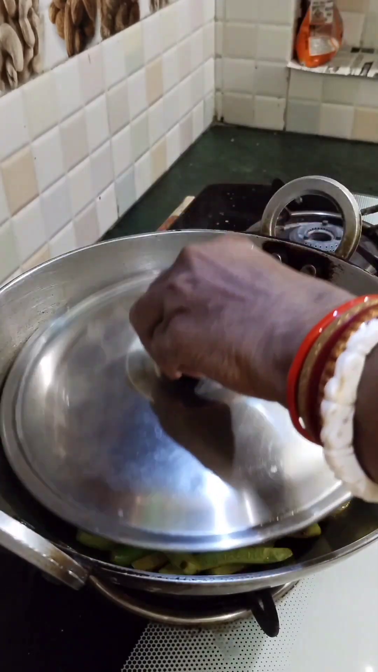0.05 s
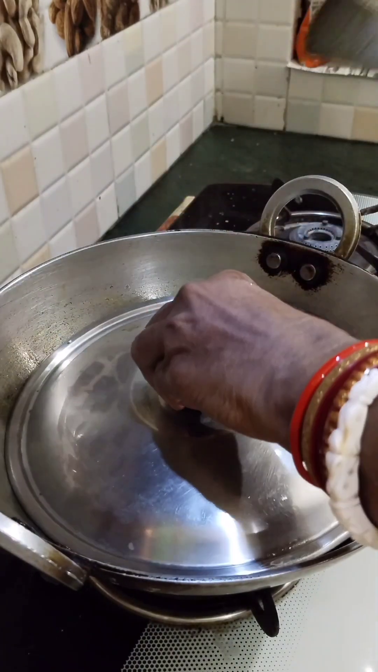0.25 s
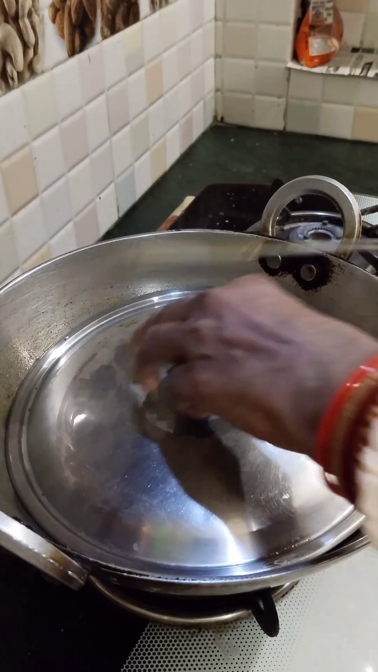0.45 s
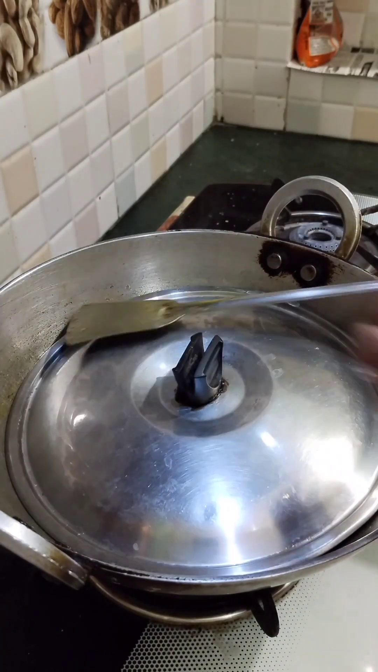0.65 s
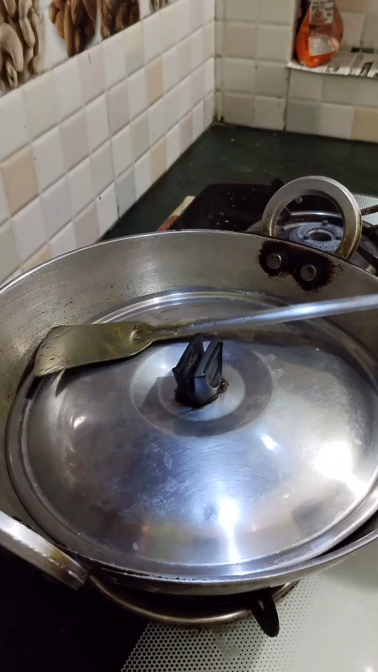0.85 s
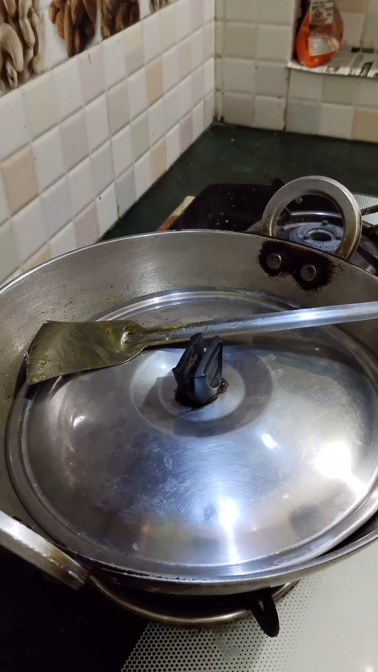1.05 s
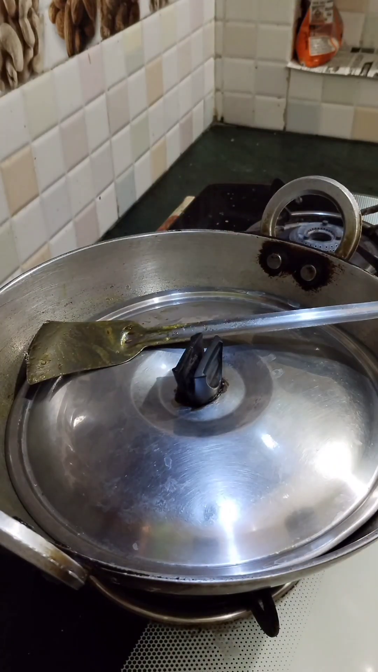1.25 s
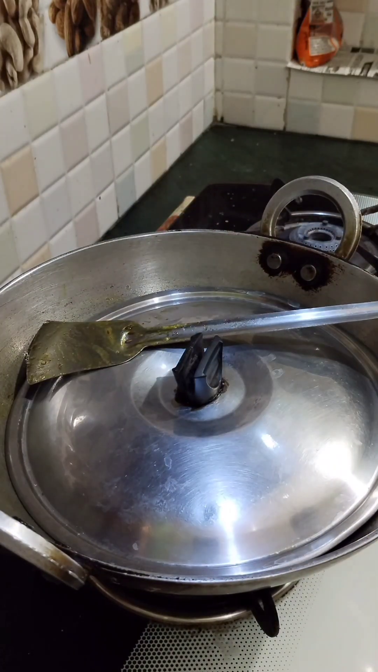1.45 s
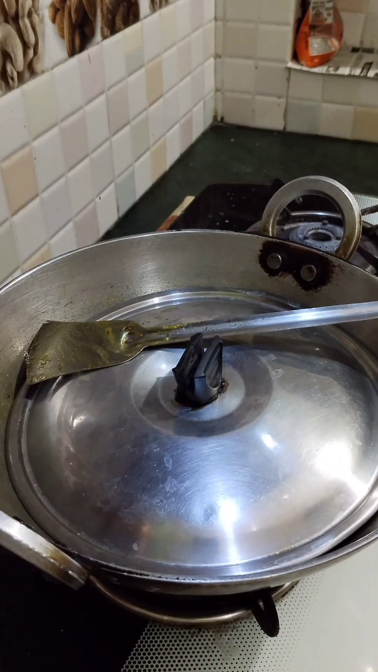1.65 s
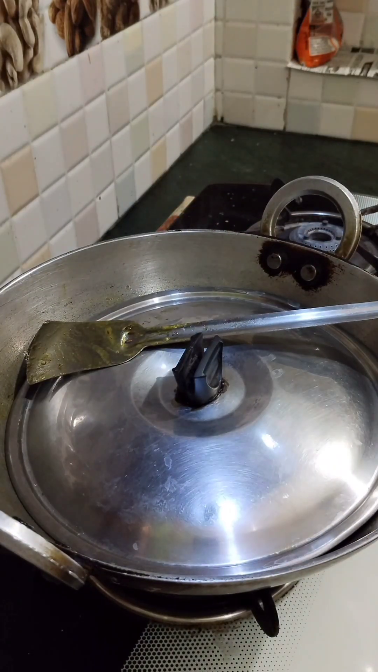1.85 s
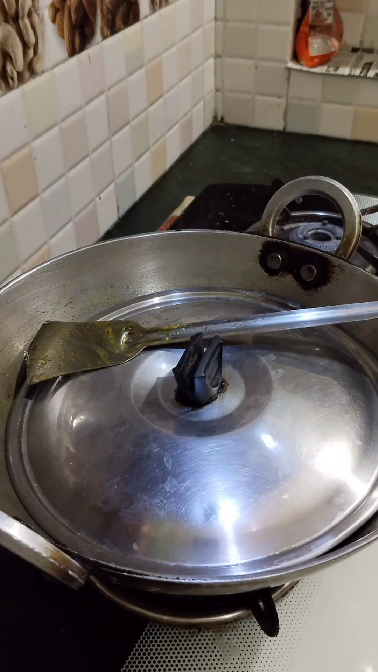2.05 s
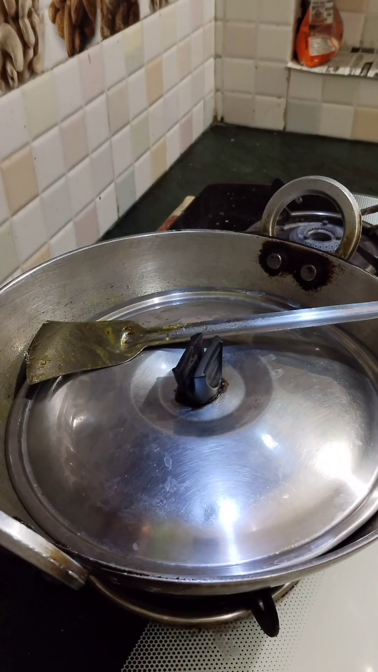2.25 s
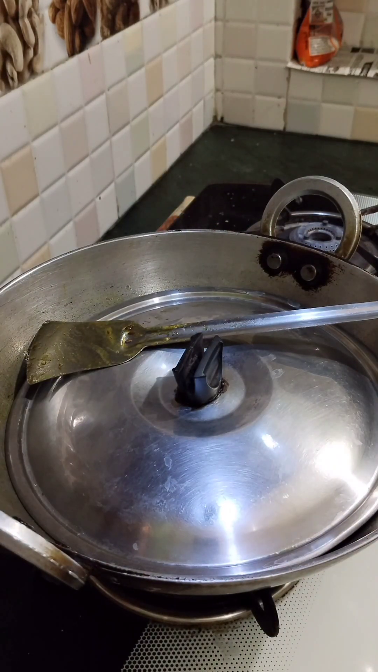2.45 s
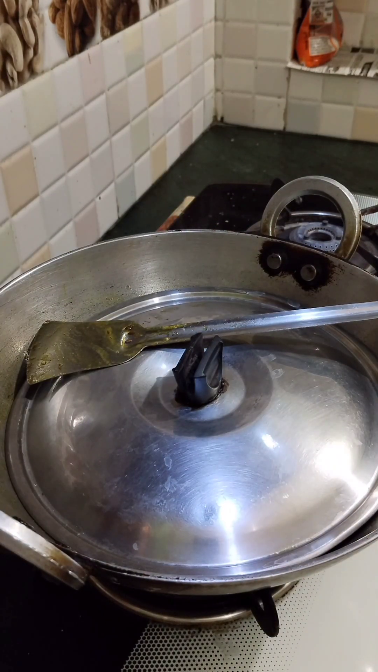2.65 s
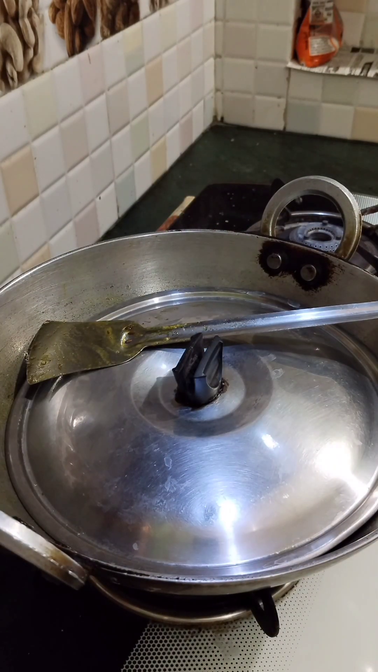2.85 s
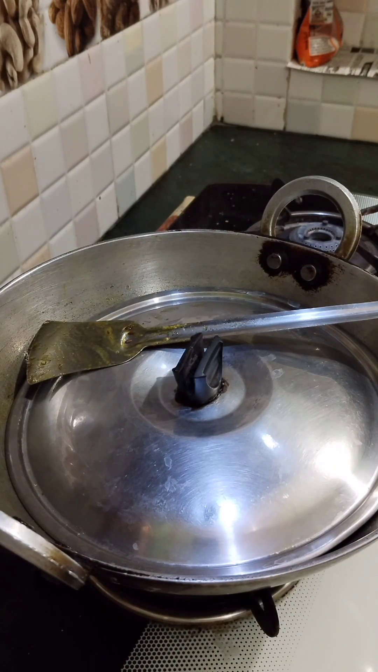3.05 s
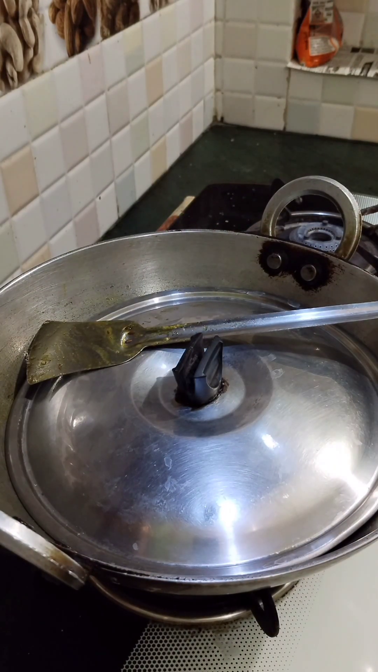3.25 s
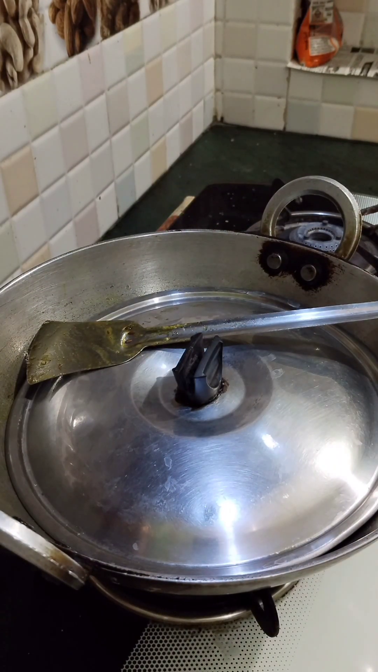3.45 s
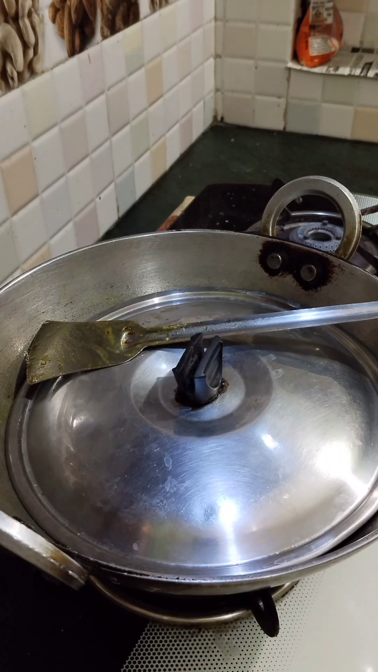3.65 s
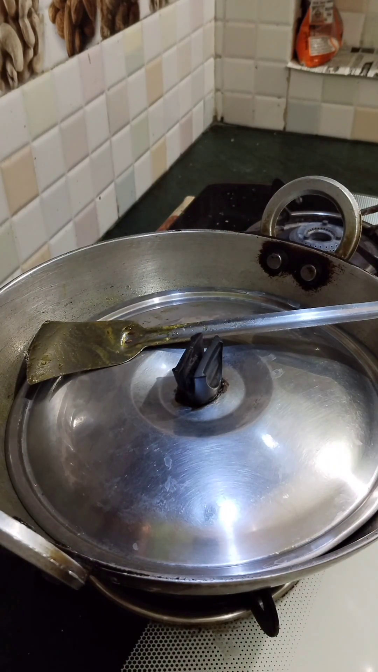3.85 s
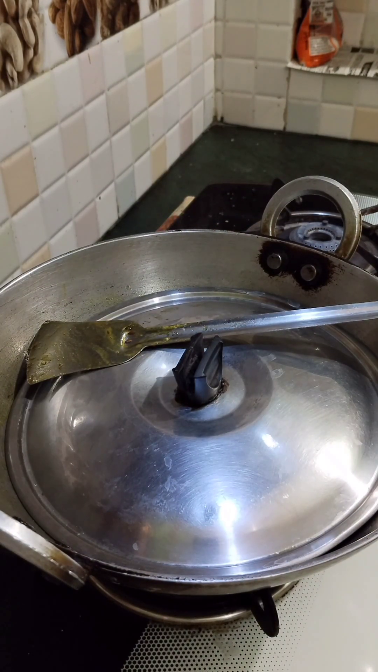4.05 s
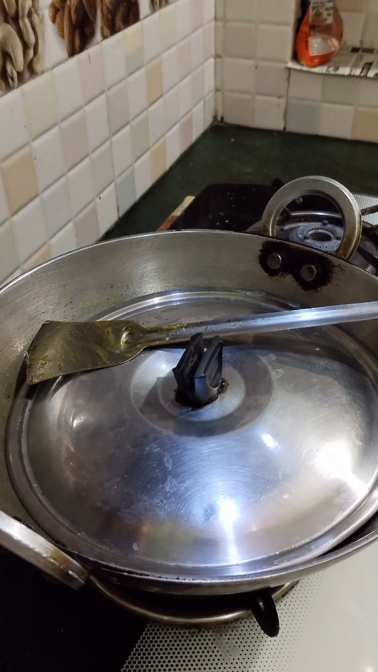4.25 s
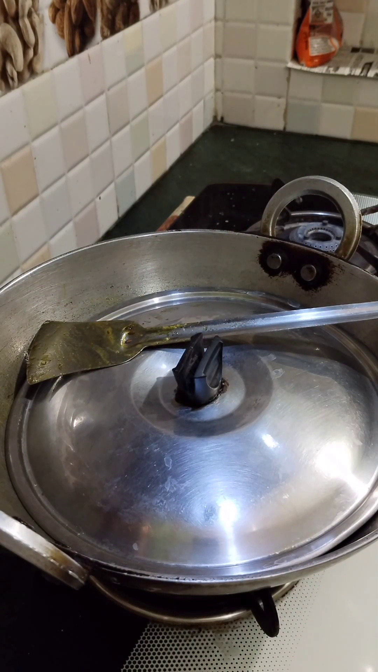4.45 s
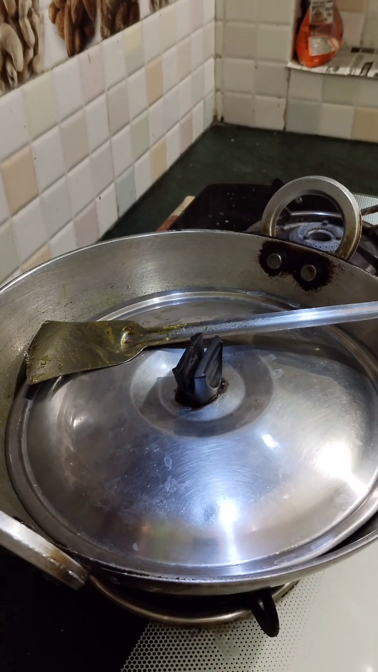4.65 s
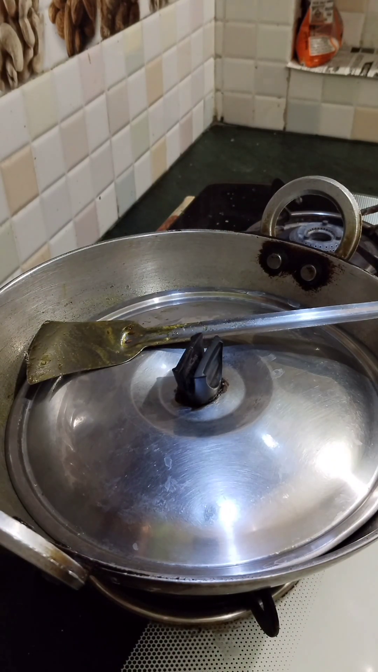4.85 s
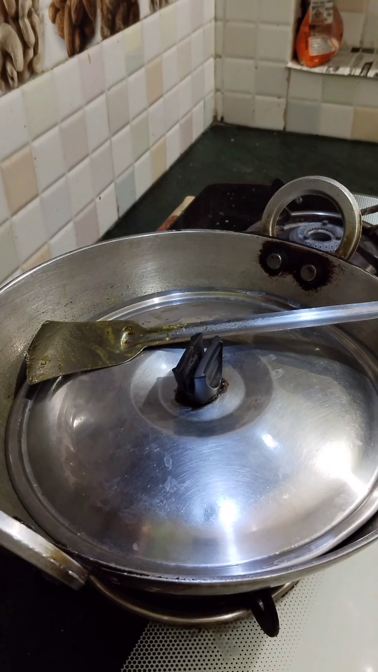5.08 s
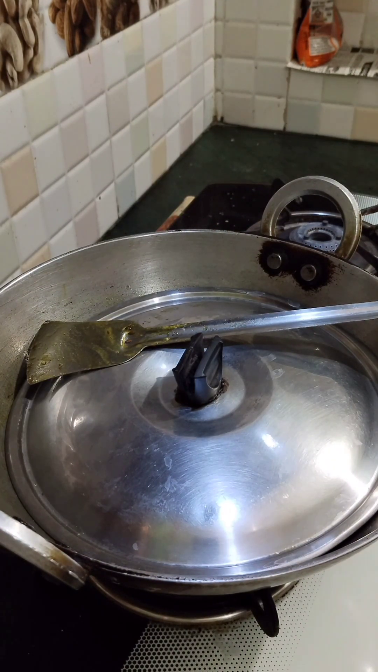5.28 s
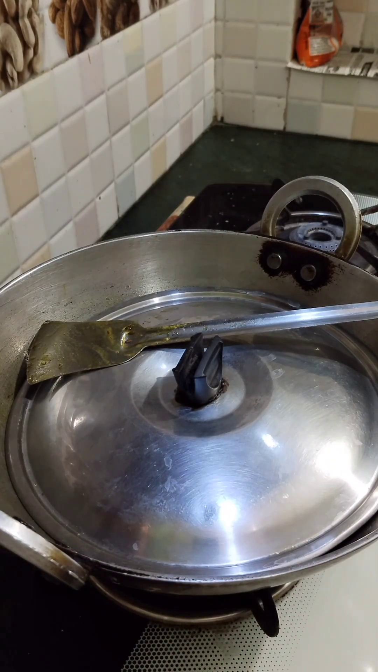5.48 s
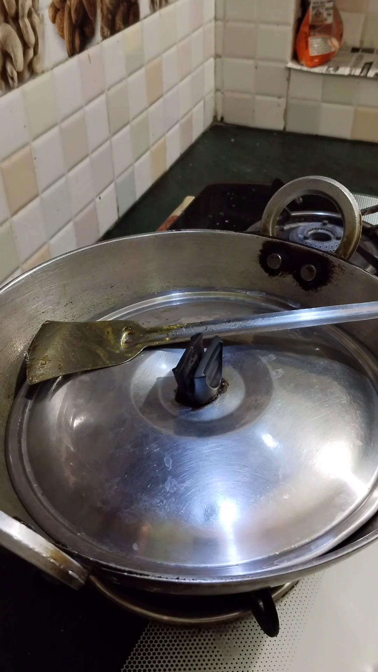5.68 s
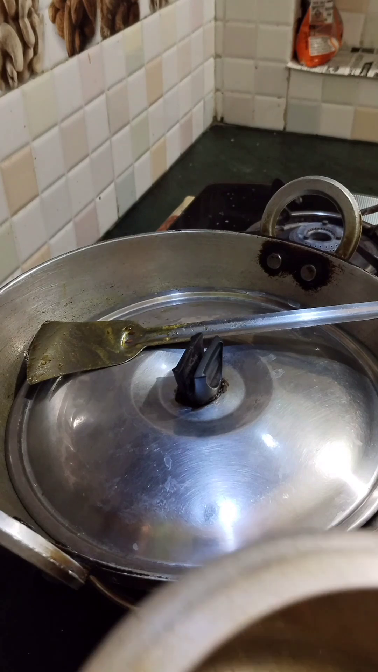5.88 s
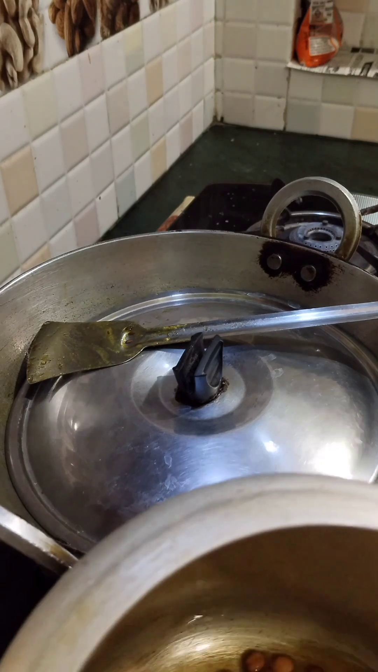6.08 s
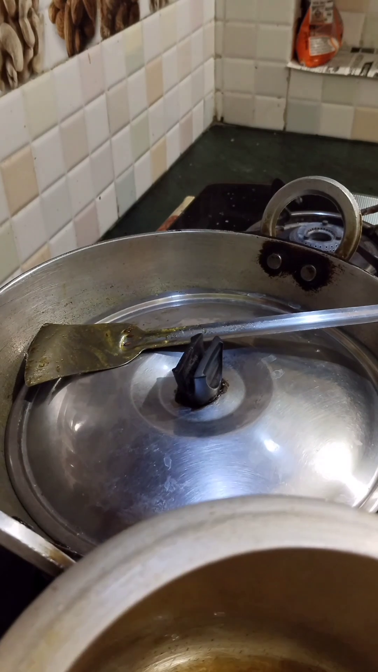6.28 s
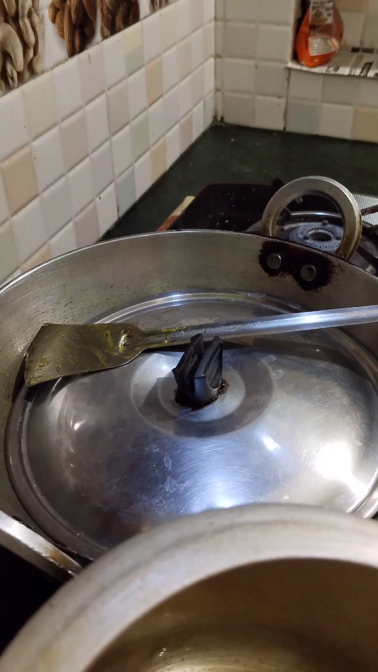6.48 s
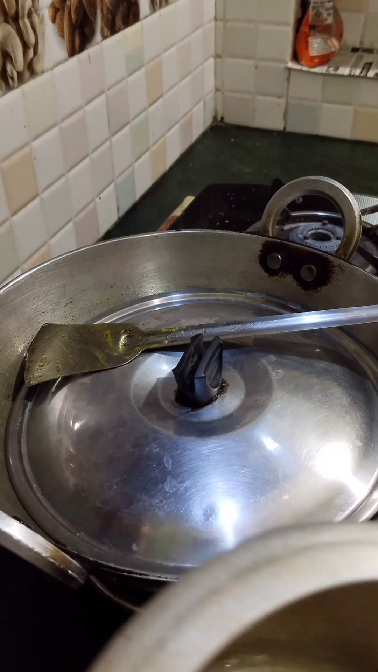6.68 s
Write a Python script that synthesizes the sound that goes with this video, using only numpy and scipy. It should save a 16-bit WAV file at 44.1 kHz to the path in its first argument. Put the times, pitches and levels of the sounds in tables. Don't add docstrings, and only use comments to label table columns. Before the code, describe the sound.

Close stereo phone sound in a small tiled kitchen. Vegetables crackle in a steel pan; a lid clanks on and the frying drops to a soft, muffled sizzle. A spatula lands with a sharp bright clack and rattles. Bowls and plates clink and ring on the worktop, a bowl drops loudly, then a pot and its lid clang, and finally a heavy vessel knocks down near the pan.

```python
import sys
import numpy as np
from scipy import signal
from scipy.fft import rfft, irfft, next_fast_len
from scipy.io import wavfile
from scipy.ndimage import uniform_filter1d

SR = 44100
rng = np.random.default_rng(int(sys.argv[2]) if len(sys.argv) > 2 else 0)


def boost_factor(decibels):
    exponent = np.asarray(decibels, float) / 20
    return 10 ** exponent


def pcm_store(signal):
    levels = np.round(np.clip(np.atleast_2d(signal), -1, 1) * 32767)
    wavfile.write(sys.argv[1], SR, levels.astype(np.int16).T)


N = 296352

# pitch_hz, level_db
DOME_SPECTRUM = [(180, -47), (300, -10.5), (380, -16), (437, -11.5), (900, -12.5), (1100, -5.5),
                 (1310, 0.5), (1690, -11.5), (1970, 2.5), (2410, -3), (2680, 1.5), (3270, 0.5), (4240, -8),
                 (6500, -11), (11000, -120)]
# pitch_hz, level_db
HISS_SPECTRUM = [(2350, -10), (5730, -7), (7270, -6), (7790, -0.5), (8500, -0.5), (10200, -8.5),
                 (13500, -10.5), (15500, -9)]


def evened(x):
    return x / np.sqrt(np.mean(x ** 2) + 1e-20)


def read(points, hz):
    point_hz, value = np.transpose(points)
    return np.interp(np.log(hz + 1), np.log(point_hz + 1), value)


def curve(rows):
    return np.interp(np.arange(N) / SR, *np.transpose(rows))


def add(mix, start_s, sound):
    part = mix[:, round(start_s * SR):][:, :sound.shape[1]]
    part += sound[:, :part.shape[1]]


def spread(hz, apart_db=0):
    # pitch_hz, level_db
    port_difference = [(60, -15), (200, -10), (380, -4), (700, .5), (1400, 2), (2380, -.5), (4400, 0),
                       (15000, -1)]
    return boost_factor(np.array([0 * hz, read(port_difference, hz) + apart_db]))


def coloured(x, points, tilt_db=0, apart_db=0):
    lag_rad = 1.2
    hz = np.fft.rfftfreq(x.shape[1], 1 / SR)
    gain = boost_factor(read(points, hz) + tilt_db * np.log2(hz / 2000 + .01))
    gain = gain * spread(hz, apart_db) * np.exp([[0], [-1j * lag_rad]])
    return irfft(rfft(x) * gain, x.shape[1])


def causal(points):
    hz = abs(np.fft.fftfreq(4096, 1 / SR))
    log_gain = np.log(boost_factor(np.maximum(read(points, hz), -60)))
    phase = -signal.hilbert(log_gain).imag
    return np.fft.ifft(np.exp(log_gain + 1j * phase)).real[:2048]


def drift(per_s):
    hz = np.fft.rfftfreq(N, 1 / SR)
    return evened(irfft(rfft(rng.standard_normal(N)) / (1 + (hz / per_s) ** 2), N))


def bubbles(per_s, spread_db, wet_s, shared):
    chance = per_s / SR * boost_factor(1.1 * drift(10))
    size = boost_factor(spread_db * np.minimum(rng.exponential(1, (3, N)), 4.5))
    draw = rng.random((3, N))
    bursts = size * (draw < chance) * np.sign(draw - chance / 2)
    clicks = shared * bursts[0] + bursts[1:]
    keep = boost_factor(-120 / (wet_s * SR))
    smear = np.sqrt(signal.lfilter([1 - keep], [1, -keep], clicks ** 2))
    return clicks + 1.1 * smear * rng.standard_normal((2, N))


def clatter_swells():
    # start_s, rise_and_fall_s, dome_lift_db, hiss_lift_db
    swells = [
        (2.77, .3, 1.5, 3.5),
        (3.26, .25, 6.5, 3.5),
        (4.7, .22, 6, 11),
    ]
    t = np.arange(N) / SR
    return sum(np.outer(lift_db, np.maximum(1 - abs(t - s) / half_s, 0)) for s, half_s, *lift_db in swells)


def frying():
    # start_s, level_db
    sizzle = [
        (0.0, -37.5),
        (0.34, -42),
        (1.5, -44.5),
        (2.4, -42.5),
        (3.65, -44.5),
        (4.04, -44.5),
        (4.23, -47.5),
        (6.72, -46.5),
    ]
    # pitch_hz, width_hz, level_db
    lid_hum = [
        (433.4, 13, -16.5),
        (489.4, 20, -18),
    ]
    spits = bubbles(2500, 2.8, 0.05, 0.4)
    dome = coloured(spits, DOME_SPECTRUM)
    dome /= np.std(dome[0])
    for hz, width_hz, db in lid_hum:
        hum = evened(signal.lfilter(*signal.iirpeak(hz, hz / width_hz, SR), spits))
        dome += boost_factor(db) * spread(hz)[:, None] * hum
    hiss = coloured(bubbles(7000, 2.5, 0.045, 0.11), HISS_SPECTRUM)
    hiss /= np.std(hiss[0])

    t = np.arange(N) / SR
    level_db = curve(sizzle)
    dome_lift_db, hiss_lift_db = clatter_swells()
    hiss_db = -47.5 + .3 * (level_db - level_db.mean())
    hiss_db = hiss_db - .9 * t
    hiss_db = hiss_db + 5 * np.exp(-t / .2)
    hiss_db = hiss_db + hiss_lift_db
    return dome * boost_factor(level_db + dome_lift_db - 1.48) + hiss * boost_factor(hiss_db + 1.6)


def room_tone():
    # pitch_hz, level_db
    rumble_spectrum = [(15, -48), (25, -16), (65, 1), (151, -1.5), (243, -10), (400, -17), (520, -35),
                       (880, -120)]
    # pitch_hz, level_db
    fan_orders = [
        (75.4, -55),
        (140.0, -62.5),
    ]
    start_db, fade_db_per_s = -59, .55
    tone = coloured(rng.standard_normal((2, N)), rumble_spectrum)
    tone *= boost_factor(start_db - fade_db_per_s * np.arange(N) / SR) / np.std(tone[0])
    for hz, db in fan_orders:
        turns = np.cumsum(hz * (1 + 0.0089 * drift(0.89))) / SR + rng.random()
        level = boost_factor(db - 11.0 + 1.4 * drift(3.3)) * np.sqrt(2)
        tone += spread(hz)[:, None] * level * np.sin(2 * np.pi * turns)
    return tone


def tail(share, length):
    # pitch_hz, t60_s
    kitchen_decay = [(150, 0.64), (400, 0.47), (1040, 0.49), (2760, 0.38), (7280, 0.29)]
    hz = np.fft.rfftfreq(256, 1 / SR)
    t = np.arange(length // 128 + 2) * 128 / SR
    re, im = rng.standard_normal((2, 2, len(hz), len(t)))
    t60_s = max(share, .05) * read(kitchen_decay, hz)[:, None]
    return signal.istft((re + 1j * im) * boost_factor(-60 * t / t60_s), SR, nperseg=256)[1][:, :length]


def clear_modes(modes, t, longest_s, apart_db, lean_rad, tilt_db):
    hz, db, t60_s = (column[:, None] for column in np.transpose(modes))
    t60_s = np.clip(t60_s, .03, longest_s * np.minimum(1, 2800 / hz))
    split_hz = 0.0041 * hz * hz / 3000 * rng.uniform(0.34, 1, hz.shape)
    step = np.exp((2j * np.pi * np.array([hz, hz + split_hz]) - np.log(1000) / t60_s) / SR)
    main, twin = np.cumprod(np.broadcast_to(step, step.shape[:2] + t.shape), axis=2)
    turn = (np.pi / 2 - lean_rad + .3 * rng.standard_normal(hz.shape)) * [0, 1]
    level = spread(hz[:, 0], apart_db) * boost_factor(db + tilt_db * np.log2(hz / 2000)).T * np.exp(-1j * turn.T)
    return (level @ (main + 0.42 * twin)).imag


def dense_modes(colour, t, share, apart_db, tilt_db):
    wash = coloured(tail(share, len(t)), colour, tilt_db, apart_db)
    ridges = evened(uniform_filter1d(rng.standard_normal(len(t) // 2 + 1), size=round(70 * t[-1])))
    return irfft(rfft(wash) * boost_factor(3.5 * ridges), len(t))


def contacts(rattle_s, t):
    touch = rng.standard_normal(3000) * (rng.random(3000) < .012) * np.exp(-t[:3000] / max(rattle_s, .001))
    touch = touch * [[.25], [1]]
    touch[:, 0] = 2.13
    touch[0] *= np.linalg.norm(touch[1]) / np.linalg.norm(touch[0])
    return touch


def blow(modes, colour, longest_s, apart_db, lean_rad, share, clear_db, rattle_s, tilt_db=0.3):
    tick_db, tick_s = -15, .004
    rise_s = .0011
    crest = 2.7
    t = np.arange(next_fast_len(round(max(longest_s, .42) * SR), True)) / SR
    clear = clear_modes(modes, t, longest_s, apart_db, lean_rad, tilt_db)
    dense = dense_modes(colour, t, share, apart_db, tilt_db)
    start = slice(0, 900)
    clear = boost_factor(clear_db + .6) * clear / np.std(clear[0, start])
    dense = dense / np.std(dense[0, start])
    edge = np.diff(dense, prepend=0)
    dense += boost_factor(tick_db) * edge / np.std(edge[0, start]) * np.exp(-t / tick_s)

    body = np.array([clear, dense])
    mean_hz = np.transpose(modes)[0].mean()
    body *= np.clip(np.minimum(t * mean_hz / 1.3, (t[-1] - .06 - t) / .1), 0, 1)
    body *= 1 - np.exp(-(t / rise_s) ** 2)
    touch = contacts(rattle_s, t)
    sound = signal.fftconvolve(body, touch[:, None], axes=2).sum(0)[:, :len(t)]
    return sound / (crest * np.sqrt(uniform_filter1d(sound[0, :2200] ** 2, size=400).max()))


def clanks():
    # (start_s, peak_db, rattle_s and, where the
    # spot struck matters, tilt_db an octave)
    lid = ([(170, -5.5, .2), (434, 0, .25), (485, 1.5, 0.2), (864, 10, 0.12), (1054, -10, 0.27),
           (1267, -2, 0.5), (1420, -5, .2), (1880, -7, .5), (2900, -10, .3), (3800, -9, .15)], [(150, -7.5),
           (396, -23), (490, 3.5), (656, -16), (860, -8), (966, -17), (1290, -0.5), (1700, -12),
           (7000, -15), (15500, -26)], 0.67, 0.89, 1.5, [(0.083, -10.5, 0.02), (.125, -20, .015, 1)])
    lid_settling = ([(440, -10, .15), (483, 0, 0.27), (772, -13, 0.3), (892, -5, 0.13), (1203, 4, 0.14),
                    (1330, -9, 0.5)], [(150, -36), (380, -16), (476, -0.5), (643, -12), (1300, -19),
                    (4000, -25.5), (5200, -59), (8800, -120)], 0.33, .7, 6.5, [(0.226, -12.5, 0.0083),
                    (0.284, -25, 0.0045)])
    blade = ([(434, -11, .25), (872, -11, 0.12), (1115, -6, 0.1), (3010, -10, .1), (5950, 0, .07),
             (7700, -1, .16), (8100, 0, .08), (8900, -2, .07)], [(150, -15), (230, -24), (350, -22),
             (432, -16), (650, -22), (1150, -15), (2200, -17), (3510, -18), (7920, -10), (15500, -31.5)],
             0.54, .5, -3, [(0.7865, -4.5, 0.004)])
    blade_rebound = ([(3015, 0, .12), (6300, -8, .08), (1500, -9, .1)], [(300, -36), (1300, -16),
                     (3000, -6), (8000, -14), (15500, -35)], .4, .5, 8, [(0.805, -14, .004)])
    handle = ([(433.5, -2.5, 0.27), (485.7, -2, 0.36), (1251, 0, 0.36), (3016, -6, .3), (5850, -4, 0.11),
              (7750, -5, .25), (9000, -8, .08)], [(120, -29), (282, -37), (432, -4), (1000, -18),
              (1220, -11.5), (2920, -16), (5960, -19), (15500, -35)],
              0.4, .66, 1.5, [(0.9075, -18, 0.005, 0), (0.915, -18.5, 0.01, 1), (0.932, -12, 0.008, -3),
              (0.941, -11, 0.015, 3)])
    cutlery = ([(870, -9, .55), (3600, -6, .06)], [(410, -51), (861, -24), (943, -13), (1050, -17),
               (2200, -18), (6940, -12.5), (8320, -4), (10300, -19), (15500, -26)],
               0.69, .56, -14.5, [(2.7405, -18, 0.018), (2.762, -26, .008), (3.5768, -27.5, 0.022, 3.5),
               (4.0294, -32, 0.014, 4), (4.1579, -35, 0.032, 4)])
    pot_rim = ([(1120, 0, 0.071), (1310, 5.5, 0.067), (1580, -3, 0.092), (3850, -1, .12), (5380, -4, .15)],
               [(150, -14), (270, -20), (453, -8), (860, -12), (1110, -8), (3980, -6.5), (8330, -9),
               (15500, -23)], .25, .66, -1, [(4.515, -14.5, .008, -1.5), (4.52, -13, 0.04, 2),
               (4.536, -17, .015, 1), (4.56, -14.5, 0.012, 2)])
    pot = ([(178, -9, .3), (278, -9, .25), (677, -3, 0.28), (1875, -5, 0.23), (2545, -6, 0.22),
           (3180, -10, 0.18), (3925, -4, .25), (5346, -3, .3), (6880, -10, .12), (7200, -8, .15),
           (8200, 1, .25)], [(120, -23), (271, -12), (552, -7), (662, -1.5), (863, -13), (1830, -13),
           (2490, -8), (8420, -12), (10300, -21), (15500, -30)], .4, .67, -0.6, [(4.574, -17, .005),
           (4.581, -5, 0.02), (4.599, -12, 0.013)])
    pot_lid = ([(179, 0.4, 0.5), (2480, 7.5, 0.21), (2780, 12, 0.15), (3240, -2, .3), (5550, 3, .2),
               (8100, -8, .15)], [(120, -18), (180, -2), (212, -20), (265, -7.5), (650, -14), (2160, -23),
               (2810, -3), (5960, -16), (8300, -8), (10300, -20), (15500, -24)],
               .6, .62, -6, [(4.745, -22, .004), (4.7505, -5.5, 0.014), (4.821, -9, 0.01, 1.5),
               (4.83, -12, .008), (4.85, -19, .012)])
    cooker = ([(142.3, -17, 0.59), (432, -1.5, .27), (489, -2, 0.2), (710, -2.5, 0.1), (1290, -3, .2),
              (1880, 1, 0.06), (1930, -7, .4), (2760, -2.5, 0.18), (3720, -4, 0.088), (4600, -10, 0.18)],
              [(70, -40), (141, -9.5), (300, -9), (478, -4), (984, -17), (1230, -14.5), (1850, -15),
              (2800, -13), (6140, -17), (15500, -35)], 0.48, .8, -0.6, [(6.147, -8, 0.005),
              (6.175, -18.5, 0.0078)])
    cooker_tap = ([(440, -3, .15), (490, -4, .15), (1290, 2, .1), (1930, -6, .08), (2700, -7, .12)],
                  [(200, -20), (478, -5), (1290, -8), (3000, -14), (6000, -30)],
                  .4, .6, 6, [(6.3, -33, .004, -2), (6.316, -26, .006)])
    shelf = ([(145, -9, 0.33), (176.7, 0.5, 0.34), (281.6, 5.5, .4), (343.3, 10, 0.36)], [(60, -34.5),
             (160, -7), (320, 9.5), (480, -11.5), (900, -72)], .5, .45, 7, [ (2.715, -31, 0.003, -12),
             (2.75, -27.5, 0.015, -13), (2.846, -24, 0.0082, 7), (3.075, -27, .02, -8), (3.11, -23, .01, 4),
             (3.207, -16.5, 0.008, 2), (3.25, -16, .01, 3), (3.318, -16.5, 0.02, 5)])
    bowl = ([(864, -13, 0.78), (1080, 3, .03), (1280, 2, .04), (2650, -2, .09), (2690, -6, .5),
            (3500, -12, 0.2), (4100, -9, .08), (5660, -5, .17)], [(290, -66), (450, -28), (1030, -5),
            (1100, -3.5), (1650, -26.5), (2570, -11.5), (4840, -25), (5830, -21.5), (15500, -40)],
            0.93, .53, 3, [(2.843, -11, 0.003, 1)])
    plates = ([(868, -7, .4), (1330, -10, .2), (1600, -9, .2), (2864, 0, .16), (3670, -3.5, .25),
              (4200, -7, .15), (5680, -9, .3), (8450, -4, .1), (12000, -12, .1)], [(120, -11.5), (353, -14),
              (704, -19.5), (1870, -22), (2870, -6.5), (3660, -8.5), (4960, -20), (5490, -15), (8420, -10),
              (10300, -20), (15500, -35)], 0.45, .74, -0.6, [(3.06, -12, 0.005, 1.5), (3.068, -14, .012),
              (3.085, -14, .01, 1.5)])
    bowl_nudged = ([(1032, -5, 0.66), (2465, -1, 0.079), (2660, -6, 0.7), (3550, -5, .12), (4200, -4, .1),
                   (5680, -6, .12)], [(290, -49), (500, -17), (901, -17.5), (1030, -6.5), (1850, -20),
                   (2570, -10), (8240, -16), (15500, -37)], .6, .95, -0.4, [(3.203, -12, 0.022)])
    stack = ([(968, -5, 0.26), (1058, -5, 0.26), (1162, 0, 0.09), (1275, 1, 0.16), (1550, -3, .15),
             (2480, -8, .25), (2650, 0.4, .45), (4300, -5.5, .15)], [(290, -38), (500, -14.5), (603, -23),
             (1150, 0), (1930, -19), (2610, -3), (3010, -16.5), (4190, -9.5), (8240, -11.5), (15500, -36)],
             0.48, .46, -1.5, [(3.295, -14, 0.002, -1), (3.311, -15, .004, 2), (3.3175, -9, .02),
             (3.34, -14, 0.016, 3.5)])
    bowl_dropped = ([(440, 1, 0.08), (1030, 2, .07), (1335, -7, 0.2), (1647, -5, .2), (2625, 5.5, .3),
                    (2850, -14, .3), (3450, -7, 0.2), (2930, -6, .3), (4065, 5, .08), (5615, -4, .22),
                    (6930, -1, 0.16)], [(120, -42), (270, -22), (450, -17), (800, -26), (1040, -6),
                    (1870, -14.5), (2700, -2), (3110, -8.5), (8420, -10), (15500, -33)],
                    1.0, .52, -1.2, [(3.8005, -3, 0.012), (3.835, -9, 0.008), (3.862, -15, .008)])
    bowl_freed = ([(1037, -1, .45), (2652, -11, 0.42)], [(500, -30), (1040, 0), (2650, -9), (6000, -27)],
                  1.2, .38, 8.5, [(2.862, -27, .012, 6), (3.255, -22, 0.0086), (3.862, -30, 0.0069, 6)])
    thump = ([(150, 0, .07), (260, -8, .06)], [(60, -20), (150, 0), (300, -12), (700, -60)],
             .2, .15, 6, [(2.692, -22, .002), (2.595, -41, .004, 4), (6.222, -35, .004), (6.262, -33, .004),
             (6.29, -35, .004), (6.325, -35, .004)])
    at_pan = [lid, lid_settling, blade, blade_rebound, handle, cutlery, pot_rim, pot, pot_lid,
              cooker, cooker_tap]
    on_worktop = [shelf, bowl, plates, bowl_nudged, stack, bowl_dropped, bowl_freed, thump]
    out = np.zeros((2, N))
    for apart_db, lean_rad, things in [(.15, 0.03, at_pan), (2.2, .15, on_worktop)]:
        for modes, colour, longest_s, share, clear_db, blows in things:
            before_s = -1
            for s, peak_db, *how in blows:
                free = share * (1.35 if s - before_s < .07 else 1)
                sound = blow(modes, colour, longest_s, apart_db, lean_rad, free, clear_db, *how)
                add(out, s, boost_factor(peak_db - 0.8) * sound)
                before_s = s
    return signal.sosfilt(signal.butter(4, 105, "high", fs=SR, output="sos"), out)


def pops():
    # start_s, peak_db
    fat_spits = [(0.377, -20), (1.186, -34), (1.36, -31), (2.4339, -27.5), (2.593, -30), (2.669, -31),
                 (4.196, -29), (4.4243, -34), (5.296, -28), (5.4306, -28), (5.7293, -32), (6.0908, -34)]
    t60_s = .06
    out, t = np.zeros((2, N)), np.arange(3000) / SR
    ring = evened(causal(DOME_SPECTRUM)) + 0.44 * evened(causal(HISS_SPECTRUM))
    for s, peak_db in fat_spits:
        puff = .12 * rng.standard_normal((2, len(t))) * boost_factor(-60 * t / t60_s)
        puff[:, 0] = 1
        pop = signal.oaconvolve(puff, ring[None], axes=1)
        add(out, s, boost_factor(peak_db + 1) * pop / abs(pop[0]).max())
    return out


def whistle():
    middle_s, half_s, level_db = 2.04, .05, -44
    pitch_hz, sag_hz_per_s = 3062, 470
    fuzz = signal.sosfilt(signal.butter(2, 40, fs=SR, output="sos"), rng.standard_normal((2, N)))
    t = np.arange(N) / SR - middle_s
    carrier = np.cos(2 * np.pi * (pitch_hz - sag_hz_per_s * t / 2) * t)
    tone = evened((1 + .5 * evened(fuzz)) * carrier)
    return tone * boost_factor(level_db) * np.exp(-(t / half_s) ** 2)


def singing():
    # (start_s, sum_db, difference_db)
    bowl_tones = [
        (1037.1, .25, [(2.843, -60, -50), (2.85, -28, -16), (2.9, -26, -21), (2.935, -25, -22), (2.98, -29, -25), (3.04, -37, -39), (3.078, -46, -44), (3.118, -38, -41), (3.2, -43, -45)]),
        (1038.5, .8, [(3.855, -60, -60), (3.874, -28, -25), (3.895, -29, -25), (3.95, -42, -40), (3.98, -41, -39), (4.05, -46, -45), (4.13, -48, -50), (4.2, -54, -54), (4.27, -68, -66)]),
    ]
    out = np.zeros((2, N))
    for hz, lean_rad, rows in bowl_tones:
        s, *level_db = np.transpose(rows)
        t = np.arange(s[0], s[-1], 1 / SR)
        turn = np.array([[0], [np.pi / 2 - lean_rad]])
        level = np.sqrt(2) * boost_factor([np.interp(t, s, db) for db in level_db])
        add(out, s[0], level * np.sin(2 * np.pi * hz * t - turn))
    return out


def scene():
    both, apart = frying() + room_tone() + clanks() + pops() + whistle() + singing()
    return np.array([both + apart, both - apart])


def band_limit(x):
    return signal.sosfilt(signal.butter(12, 16480, fs=SR, output="sos"), x)


def record(dry):
    band = signal.sosfilt(signal.cheby2(14, 60, 16300, fs=SR, output="sos"), dry)
    return band_limit(np.clip(band, -1, 1))


dry = scene()
out = record(dry)
pcm_store(out)
```